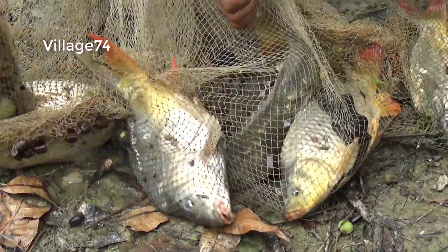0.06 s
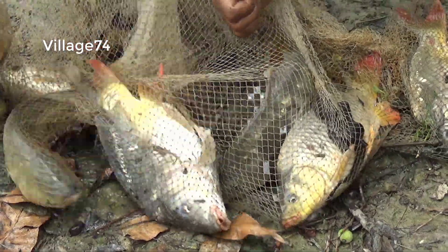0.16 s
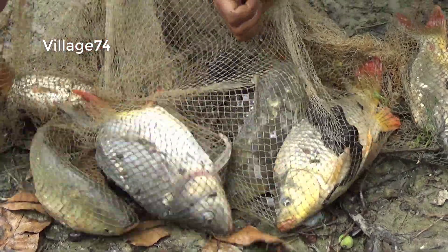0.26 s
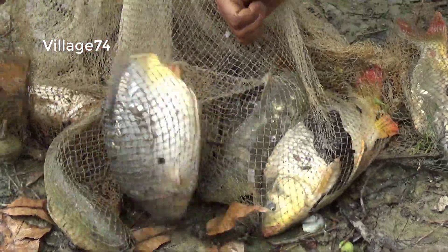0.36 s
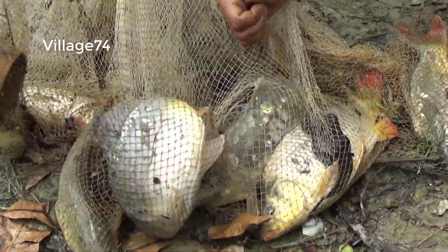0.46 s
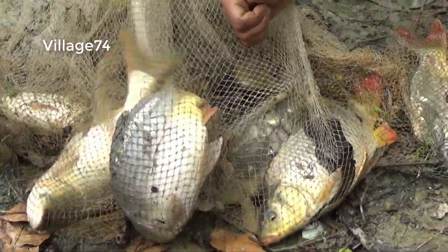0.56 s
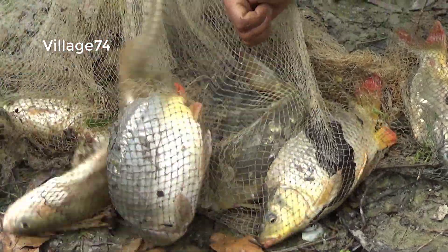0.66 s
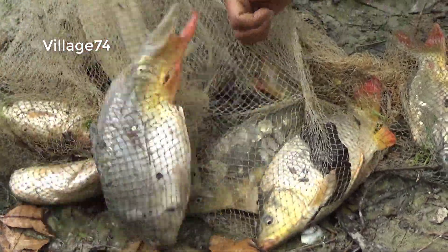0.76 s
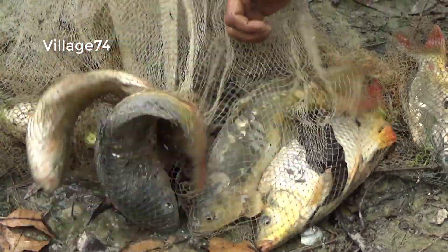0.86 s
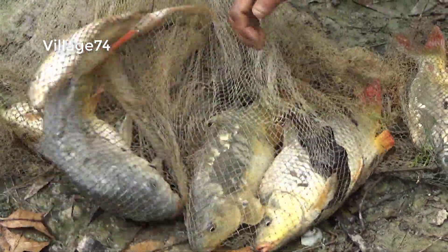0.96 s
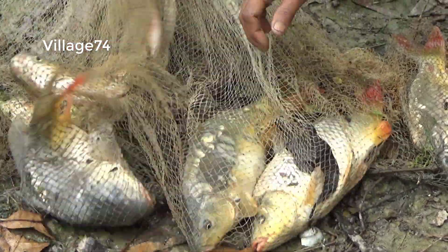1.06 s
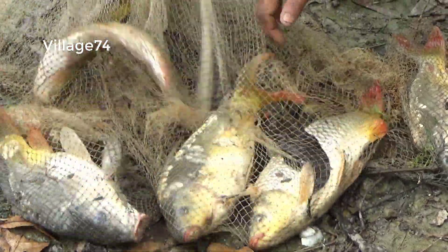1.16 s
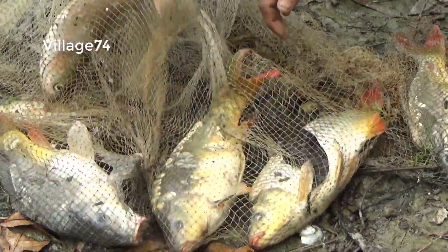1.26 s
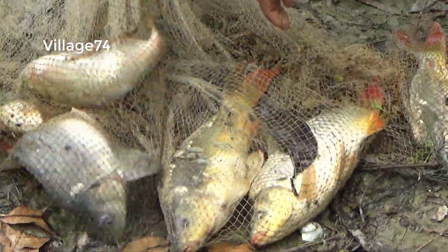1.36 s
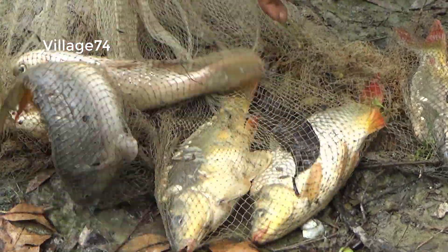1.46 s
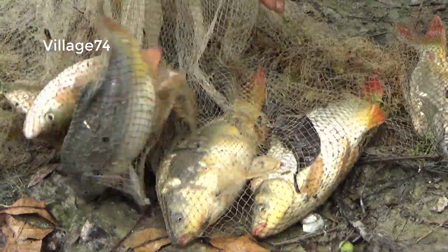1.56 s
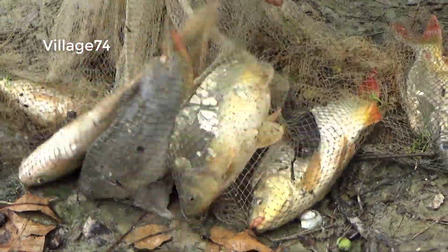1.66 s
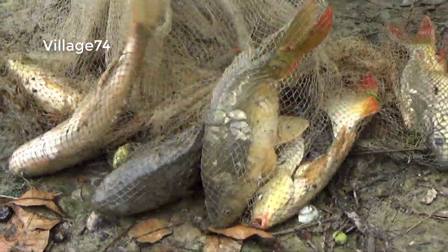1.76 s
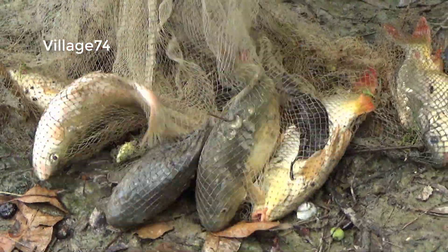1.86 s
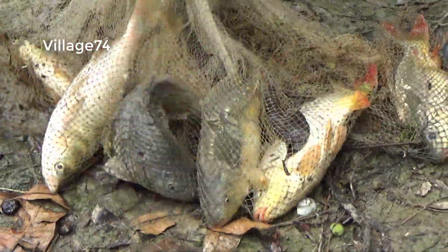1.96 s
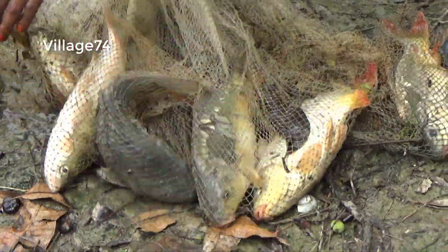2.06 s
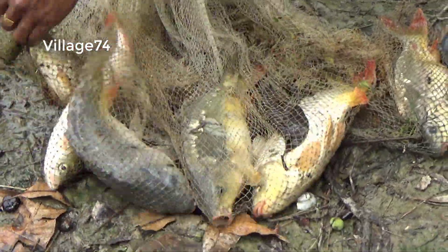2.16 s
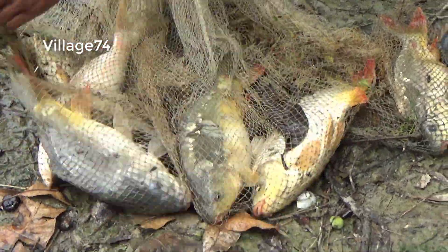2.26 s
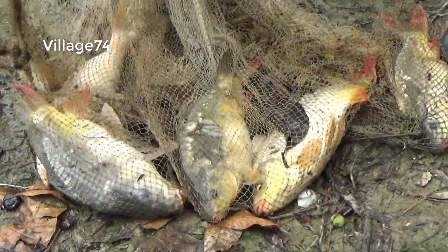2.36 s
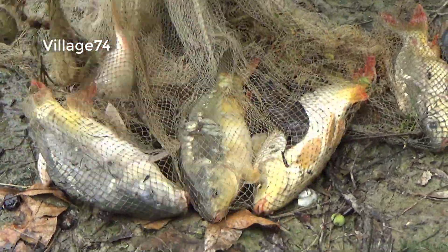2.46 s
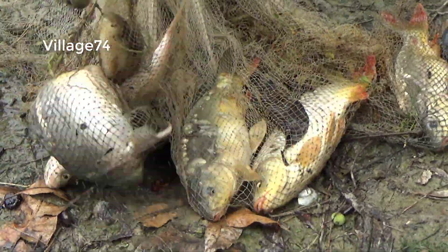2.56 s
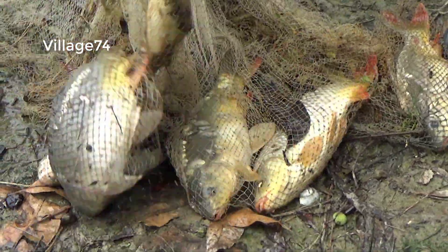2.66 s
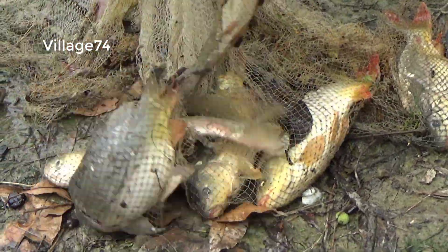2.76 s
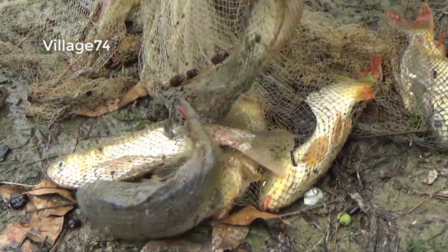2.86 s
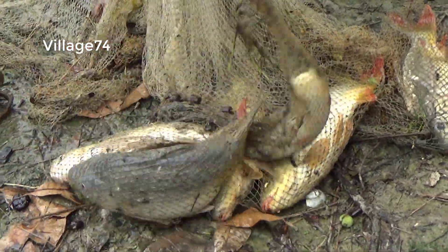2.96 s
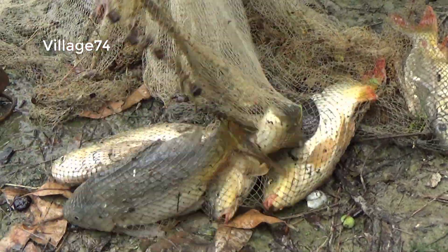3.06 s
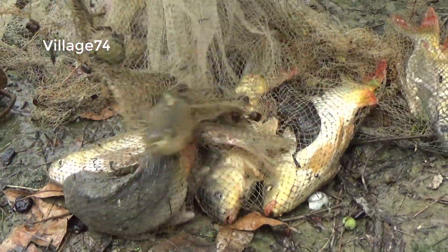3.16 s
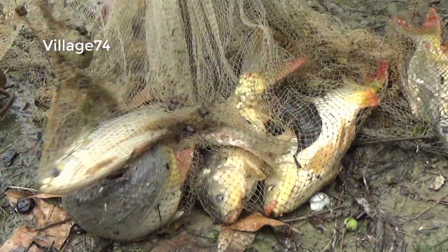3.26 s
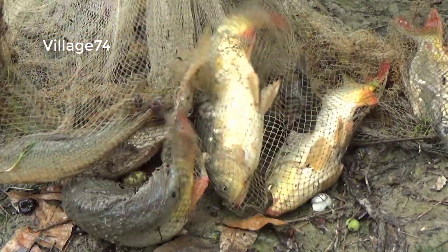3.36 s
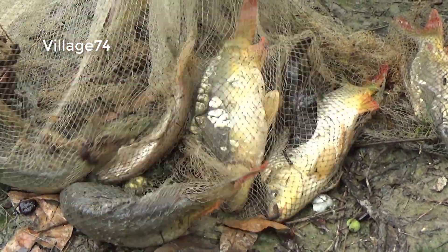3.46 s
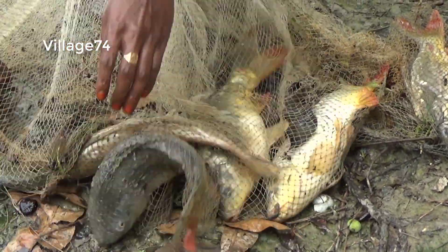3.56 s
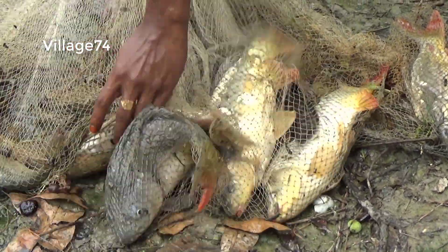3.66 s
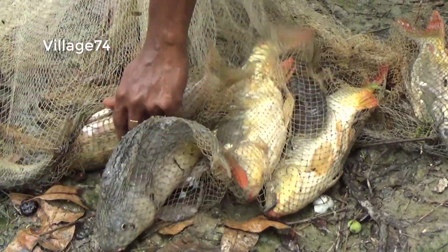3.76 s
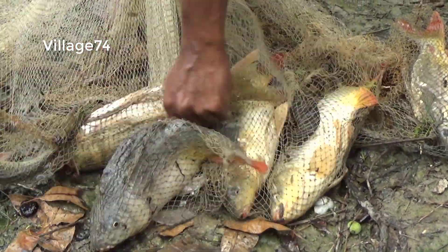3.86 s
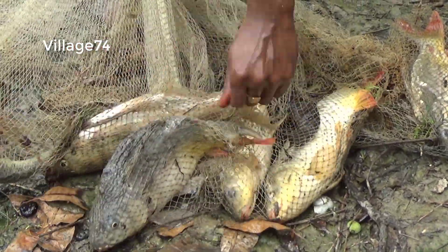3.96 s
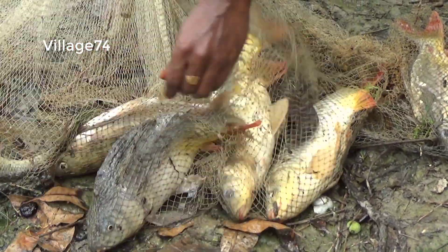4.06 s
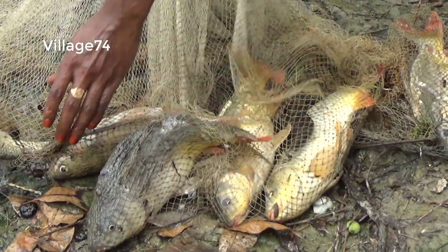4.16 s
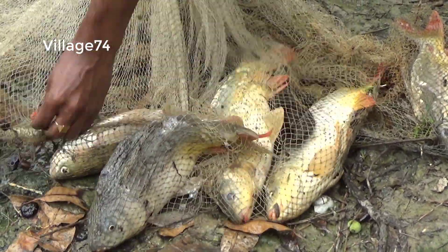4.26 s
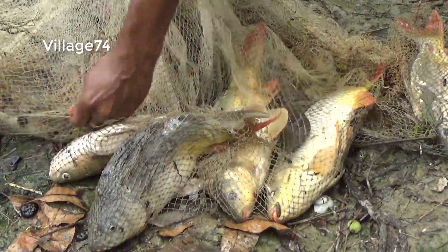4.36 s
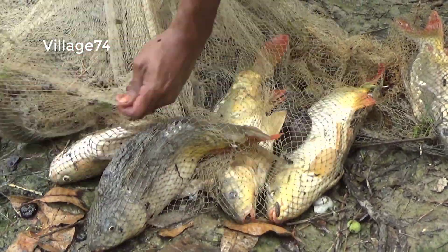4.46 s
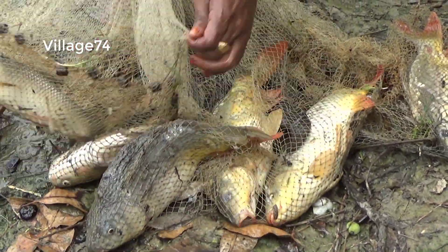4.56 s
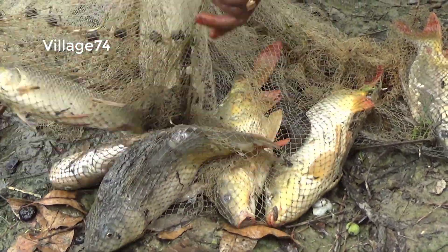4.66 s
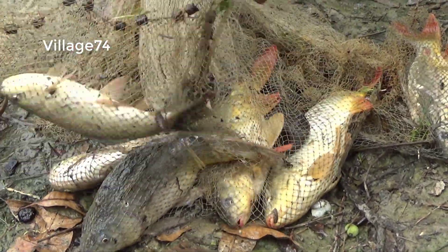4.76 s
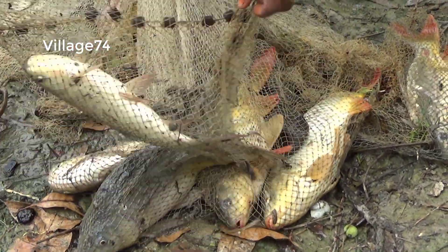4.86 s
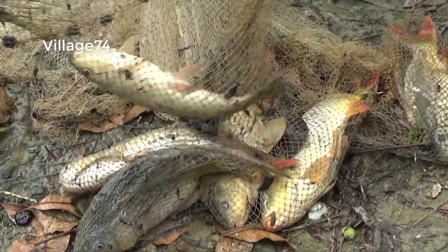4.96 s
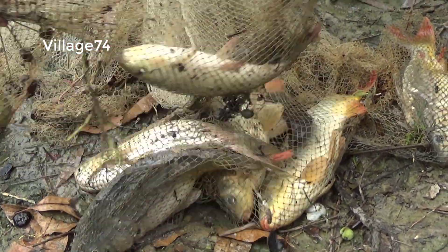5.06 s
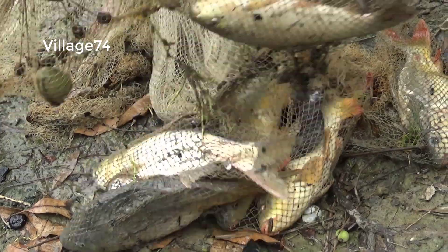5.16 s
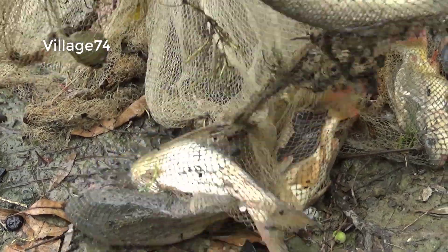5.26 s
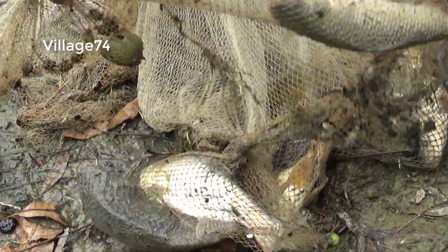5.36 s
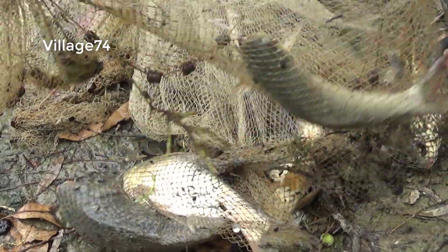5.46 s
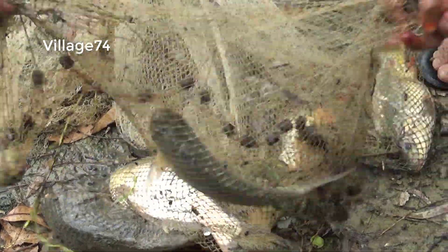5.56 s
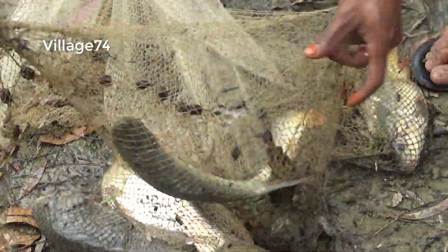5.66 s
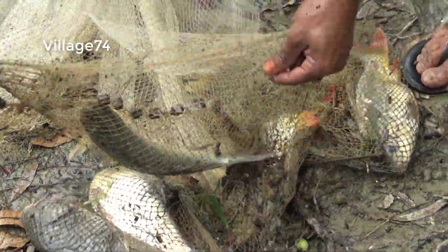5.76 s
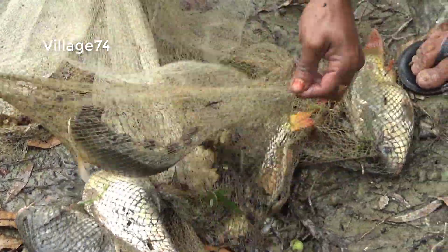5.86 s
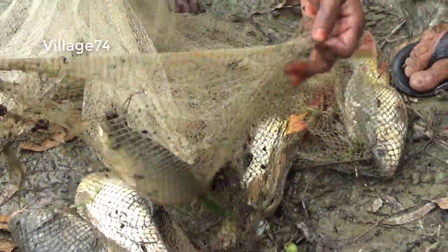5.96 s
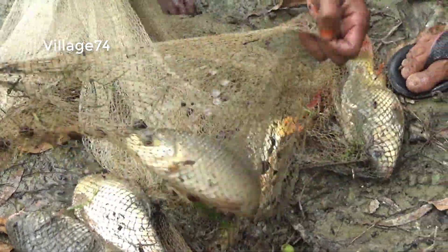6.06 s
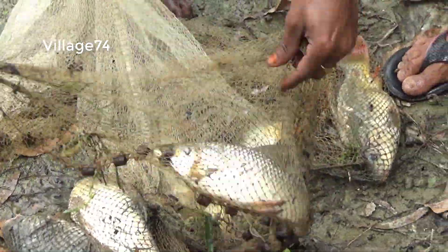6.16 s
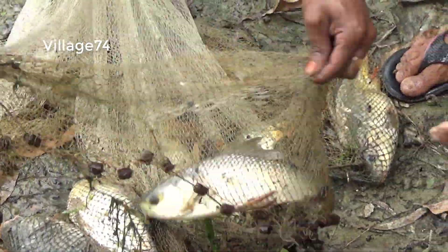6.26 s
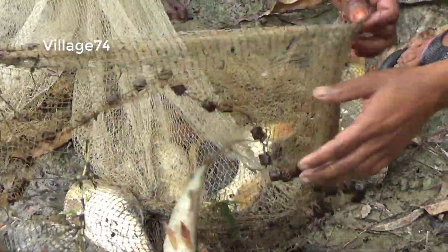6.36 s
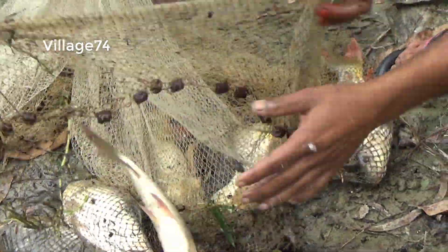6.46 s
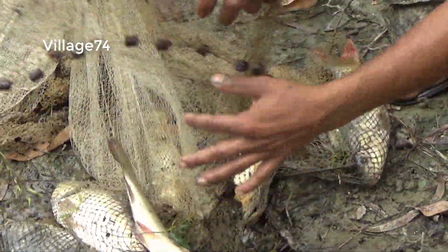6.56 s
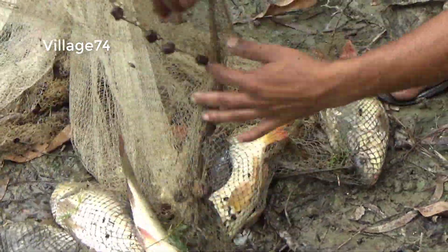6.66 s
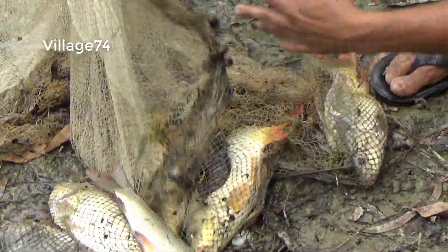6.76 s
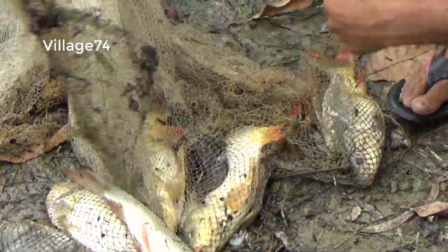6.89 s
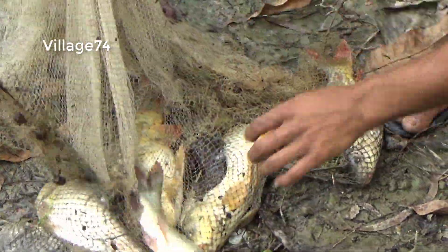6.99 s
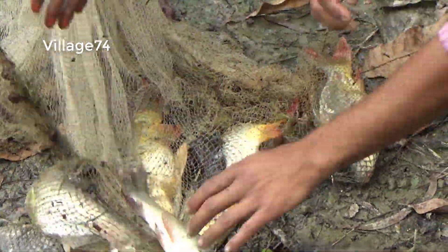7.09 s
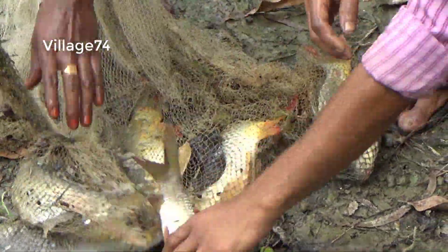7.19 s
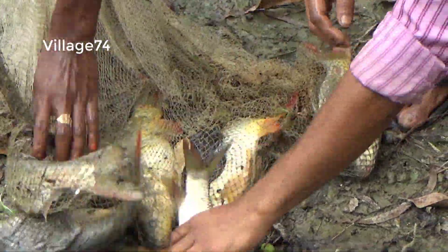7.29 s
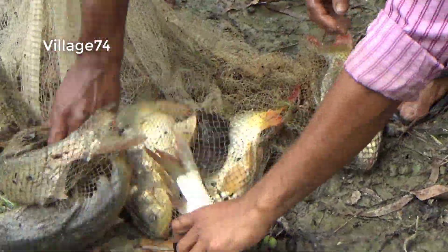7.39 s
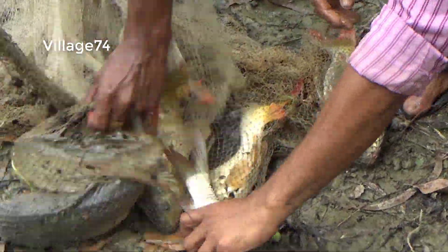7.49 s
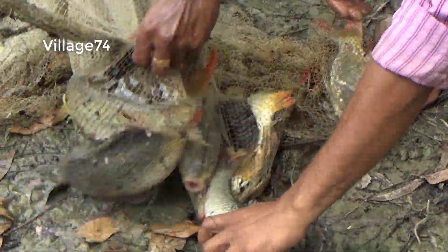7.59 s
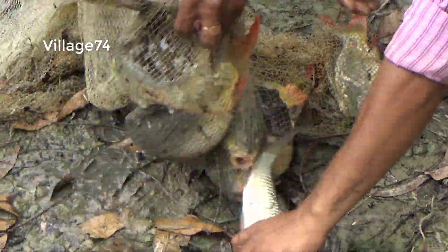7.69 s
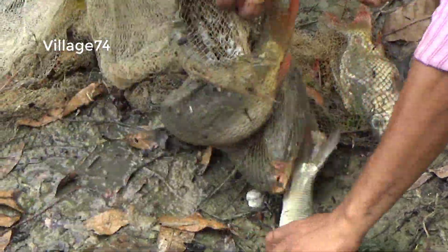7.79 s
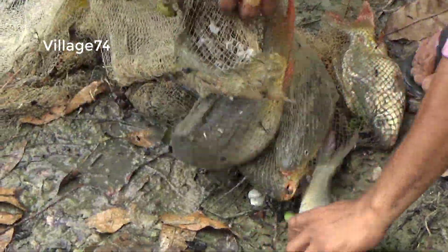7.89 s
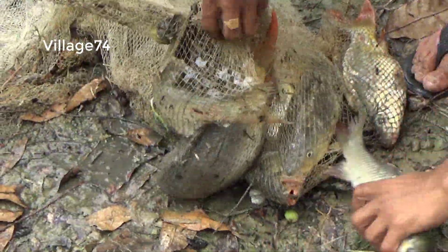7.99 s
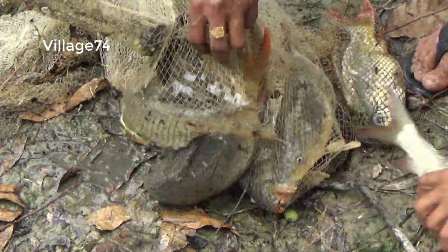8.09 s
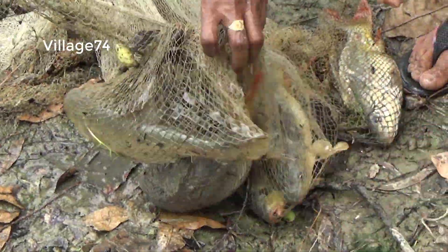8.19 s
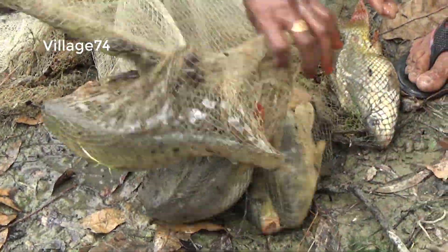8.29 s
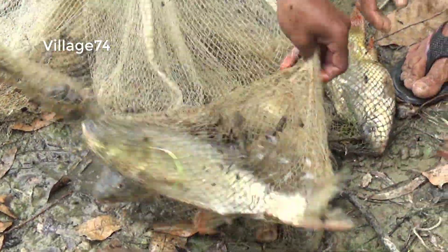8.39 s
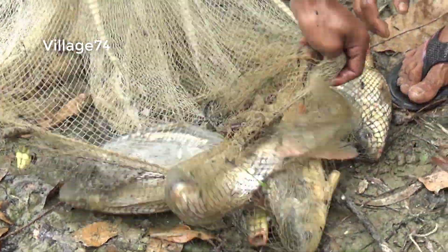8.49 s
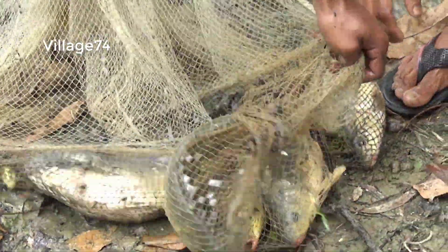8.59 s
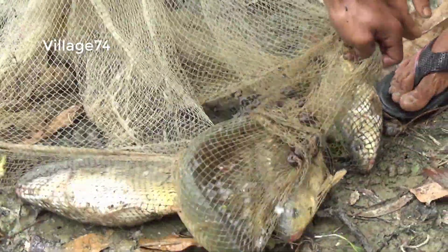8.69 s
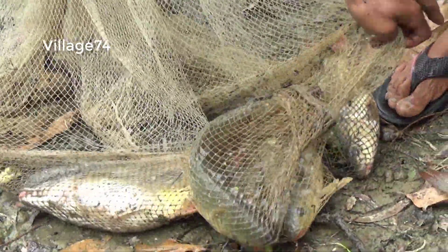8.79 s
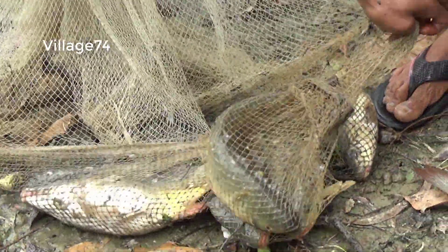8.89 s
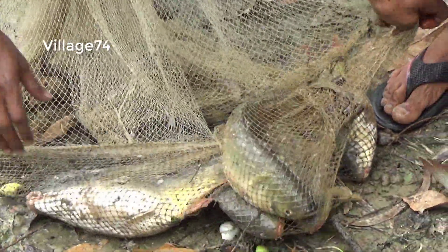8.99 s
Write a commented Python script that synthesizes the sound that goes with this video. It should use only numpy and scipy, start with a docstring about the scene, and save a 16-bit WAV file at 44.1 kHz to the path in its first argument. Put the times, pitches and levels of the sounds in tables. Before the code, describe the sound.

Close stereo microphones outdoors catch wet fish flapping inside a fishing net on soft ground. Flurries of hollow knocking slaps, slimy squelches, dull thuds and bright ticking mesh alternate with quieter rustling. The net swishes at the start and again just after five seconds. Near the end snaps gather around one strong slap and a brief sinker clink, with thin bird chips and squeaks in the background.

```python
"""Fish slap wet mud with hollow knocks and splashes; wet skin and net mesh snap, pop and crackle around them.
Knocks are short ringing tones; splashes, snaps and pops are bursts of tiny clicks, some ringing small hollows.
Dull thuds and bumps are low-pitched noise and clicks; the dragged and hauled net is a swish of random clicks.
A struck sinker is a set of fading tones. Small birds whistle from the trees, as gliding tones with a soft smear.
Behind it all lies a quiet, slightly uneven background of filtered noise."""
import sys
import numpy as np
from scipy import signal
from scipy.fft import rfft, irfft
from scipy.io import wavfile

SR = 44100
rng = np.random.default_rng(int(sys.argv[2]) if len(sys.argv) > 2 else 0)


def dump_mix(stems):
    """Bounce the given channels to the path in sys.argv[1] as a 16-bit WAV at rate SR."""
    frames = np.atleast_2d(stems).T  # one column per channel
    limited = np.clip(frames, -1, 1)  # hard clip at full scale
    pcm = np.round(limited * 32767).astype(np.int16)
    wavfile.write(sys.argv[1], SR, pcm)


N = 398223
T = np.arange(N) / SR
HIT_T = T[:SR // 6]  # time within one hit, in seconds

# Tail and flank slaps on the mud. Each row: start in seconds, knock peak in dB, knock pitch in Hz,
# splash in dB before a trim, number of contacts as the body rolls onto the mud.
SLAPS = [(0.206, -20.5, 857, -37, 1), (0.32, -23.5, 802, -39.5, 2), (0.383, -15.5, 810, -35.5, 1),
         (0.434, -29, 856, -54, 1), (0.534, -36, 775, -49, 1), (0.795, -22.5, 796, -43, 1),
         (0.814, -25, 1020, -38, 1), (0.879, -16, 854, -33.5, 1), (1.156, -23.5, 1100, -33, 1),
         (1.206, -10.5, 835, -26.5, 4), (1.392, -18.5, 848, -32.5, 1), (1.408, -12, 815, -26, 1),
         (1.601, -30.5, 764, -65, 1), (1.74, -30, 890, -39, 1), (2.26, -34, 865, -45.5, 1),
         (3.001, -21, 740, -23, 1), (3.015, -12.5, 798, -26.5, 1), (3.05, -15, 810, -33, 1),
         (3.186, -20.5, 766, -52, 1), (3.214, -21.5, 816, -39, 1), (3.37, -19, 750, -26, 3),
         (3.912, -38, 964, -46, 1), (4.923, -16.5, 810, -42.5, 1), (4.925, -22, 619, -44, 1),
         (4.955, -17.5, 754, -26, 1), (5.082, -33, 787, -39, 1), (5.207, -24.5, 770, -35, 1),
         (5.25, -29, 816, -48, 1), (5.374, -23.5, 790, -48, 1), (5.388, -22, 826, -36, 1),
         (5.402, -29, 850, -50, 1), (5.581, -23, 796, -64, 1), (5.604, -25, 772, -44, 1),
         (5.611, -14.5, 816, -44, 1), (5.642, -21, 820, -42, 2), (5.767, -28.5, 780, -45, 1),
         (5.856, -27.5, 820, -38.5, 1), (5.873, -20, 750, -31.5, 1), (6.564, -35, 750, -52, 1),
         (6.803, -38.5, 783, -62, 6), (6.983, -27, 780, -37.5, 1), (7.018, -25.5, 750, -51, 1),
         (7.054, -22.5, 860, -35, 1), (7.107, -32, 790, -45, 1), (7.761, -29, 814, -39.5, 1),
         (8.669, -15.5, 808, -23.5, 1)]
# Wet skin and mesh snapping free. Each row: start in seconds, then tick peak, splash and spray,
# each in dB before any trim.
SNAPS = [(0.1215, -7.5, -65, -43), (0.2452, -4.5, -67, -47), (0.2655, -6.5, -72, -38.5),
         (0.502, -8, -50, -37.5), (0.5739, -2, -39.5, -26.5), (0.6105, -6.5, -58, -48),
         (0.71, -16, -62, -52), (0.7282, 1, -40, -29), (0.7362, 5, -35.5, -39), (0.7402, -1, -56, -55),
         (0.7627, -16, -64, -50), (0.8704, -5, -45, -28.5), (0.9066, -3, -54, -27), (0.94, -12, -38, -45),
         (1.0226, -18, -65, -46), (1.0335, -6, -64, -39), (1.0933, -16, -38, -30.5), (1.517, -30, -41, -45),
         (1.5604, -19, -69, -47), (1.7325, -21, -46, -31.5), (1.7845, -20, -44, -28.5),
         (1.8716, -22, -63, -36), (1.954, -26, -39.5, -30), (2.1291, -18, -45, -36.5),
         (2.2463, -21, -66, -37), (2.6439, -26, -46, -32), (2.7704, -22, -47, -39.5),
         (2.9411, -5, -46, -29), (2.9841, -19, -67, -37), (3.1017, -23, -53, -27.5),
         (3.1363, -19, -44, -30), (3.18, 0, -53, -33), (3.2005, -7, -60, -28), (3.2167, 3, -58, -35),
         (3.5548, -20, -40, -29), (3.5709, -22, -30, -21.5), (3.586, -25, -38, -29),
         (3.604, -17, -37, -26.5), (3.7922, -28, -50, -34.5), (3.8065, -25, -29.5, -27),
         (3.8212, -24, -32, -38), (3.9305, -10.5, -63, -52), (4.0726, -29, -42, -45),
         (4.139, -27, -37, -34.5), (4.2202, -21, -39, -31.5), (4.2476, -14, -32.5, -45),
         (4.2655, -18, -27, -24), (4.4274, -2.5, -34, -30.5), (4.8694, -13, -63, -35.5),
         (5.277, -21, -39.5, -37), (5.486, -27, -37.5, -36), (5.9704, -32, -64, -34),
         (6.3215, -12, -69, -40), (6.3725, -4, -50, -34), (6.685, -32, -57, -35.5),
         (6.9396, -25, -46, -32.5), (7.0097, -9, -61, -31), (7.389, -24, -33.5, -31.5),
         (7.5497, -31, -47, -36.5), (7.652, -28, -44, -47), (8.3499, -26, -34, -35),
         (8.406, -16, -40.5, -34), (8.4175, -1, -40, -24.5), (8.4714, -3.5, -43, -44),
         (8.5175, -8, -60, -34), (8.531, -14, -64, -28), (8.547, -4, -59, -30.5), (8.5739, -1, -36, -24),
         (8.6158, -20, -47, -33), (8.733, -30, -41, -40), (8.8817, -13, -64, -55),
         (8.9065, -27, -48, -35.5)]
# Tone colour of splashing slime and water. Each row: frequency in Hz, relative level in dB per Hz.
SPLASH_COLOUR = [(150, -22.5), (330, -2.5), (460, -21), (550, -1), (700, 6.5), (1200, 2.5), (1500, 3),
                 (2200, 1), (3500, 2), (5500, -2), (7500, -4), (12000, -22)]
# Tone colour of fine spray and mesh. Each row: frequency in Hz, relative level in dB per Hz.
SPRAY_COLOUR = [(2500, -19), (5000, -1), (7000, 2.5), (9300, 7.5), (11000, 2.5), (13000, -3), (16000, -25)]


def from_db(db):
    """Turn decibels into a gain."""
    return 10 ** (np.asarray(db) / 20)


def rms_one(x):
    """Scale to an average strength (rms) of 1."""
    return x / np.sqrt(np.mean(x ** 2) + 1e-20)


def fade(t60):
    """Decay over one hit, falling 60 dB in t60 seconds."""
    return from_db(-60 * HIT_T / max(t60, 1e-4))


def add(track, s, sound):
    """Mix a sound into a track from time s in seconds."""
    at = int(np.clip(round(s * SR), 0, N - 1))
    track[..., at:at + sound.shape[-1]] += sound[..., :N - at]


def placed(x, pan_db):
    """Make stereo, left louder than right by pan_db."""
    return x * from_db([[pan_db / 2], [-pan_db / 2]])


def colour(x, spectrum):
    """Filter to the given spectrum without sounding ahead of the input (minimum phase); unit power gain."""
    size = 4096
    hz, db = np.transpose(spectrum)
    bins_hz = np.arange(size // 2 + 1) * SR / size
    gain = from_db(np.interp(np.log(bins_hz + 1), np.log(hz), db))
    cepstrum = irfft(np.log(rms_one(gain)))[:size // 2]
    # doubling all but the first value moves the filter's energy to its start
    one_sided = cepstrum * np.where(np.arange(size // 2) > 0, 2, 1)
    response = irfft(np.exp(rfft(one_sided, size)))
    return signal.oaconvolve(np.atleast_2d(x), response[None], axes=-1)[:, :N]


def resonate(x, hz, q):
    """Ring at one pitch; a higher q rings longer."""
    b, a = signal.iirpeak(min(hz, .45 * SR), max(q, 1), fs=SR)
    return signal.lfilter(b, a, x + 1e-18)


def drift(per_s):
    """Random wander around 0, with per_s new random values a second."""
    return np.interp(T * per_s, np.arange(4096), rng.standard_normal(4096))


def grains(per_s, spread_db, count):
    """Random clicks of uneven size over count samples, rms 1."""
    sizes = from_db(spread_db * np.minimum(rng.exponential(1, count), 4)) * rng.choice([-1, 1], count)
    return rms_one(sizes * (rng.random(count) < per_s / SR))


def spread(per_s, spread_db, width):
    """Clicks from all over the net, partly different on each side."""
    middle = grains(per_s, spread_db, count=N)
    return middle + width * grains(per_s, spread_db, count=N) * np.array([[1], [-1]])


def patter(per_s, spread_db, low_hz, high_hz, q, count=12):
    """Random clicks, each ringing briefly at one of count pitches; rms 1."""
    clicks = grains(per_s, spread_db, count=N)
    dealt = rng.integers(0, count, N)
    pitches = np.geomspace(low_hz, high_hz, count)
    return rms_one(sum(rms_one(resonate(clicks * (dealt == k), hz, q)) for k, hz in enumerate(pitches)))


def burst(t60, tail_db, tail_t60, per_s, rise, cavity_hz, cavity_share):
    """A wet film tears: dense clicks die fast and ring a small hollow of chance size."""
    shape = (fade(t60) + from_db(tail_db) * fade(tail_t60)) * (1 - np.exp(-HIT_T / rise))
    clicks = rms_one(grains(per_s, 2.95, count=len(HIT_T)) * shape)
    hollow = resonate(clicks, cavity_hz * 2 ** rng.uniform(-0.744, 0.51), q=13.0)
    clicks = clicks + cavity_share * rms_one(hollow)
    # same energy as 20 ms of sound at rms 1
    return clicks * np.sqrt(.02 * SR / np.sum(clicks ** 2))


def lead_in(t60, per_s):
    """Mesh slips over a moving body: clicks swell up to the contact."""
    return grains(per_s, 0.86, count=len(HIT_T)) * fade(t60)[::-1]


def around(events, scatter_s):
    """Pick one chance moment near each event: rows of time in seconds and two chance values."""
    rows = np.clip(rng.standard_normal((len(events), 3)), -2, 2)
    rows[:, 0] = [event[0] for event in events] + scatter_s * rows[:, 0]
    return rows


def net_levels():
    """How busy the net is, its crackle rising around each slap and snap: times, dragging dB, mesh dB."""
    # Net in motion. Each row: time in seconds, dragging in dB and mesh crackle in dB, both before trims.
    motion = [(0.0, -49, -42), (0.6, -59, -46), (1.05, -49.5, -44), (1.33, -49, -49), (1.48, -55.5, -50),
              (1.71, -54.5, -46), (1.89, -54.5, -44.5), (2.04, -48.5, -42.5), (2.21, -61.5, -45),
              (2.99, -53, -47), (3.14, -45, -39), (3.22, -47, -45.5), (3.42, -52, -39.5),
              (3.77, -48.5, -46), (3.9, -51.5, -47.5), (4.35, -56.5, -50.5), (4.68, -56.5, -47),
              (4.95, -61.5, -54), (5.1, -46, -50), (5.26, -53, -42.5), (5.51, -53.5, -48.5),
              (6.16, -62.5, -52), (6.66, -59.5, -48), (6.87, -58.5, -47), (6.99, -53, -52),
              (7.27, -58, -49.5), (7.69, -56.5, -49.5), (8.17, -57.5, -44), (8.521, -52, -42),
              (8.75, -57.5, -46.5), (8.9, -53, -45.5), (9.03, -57, -53)]
    shake_db, shake_s = 0.5, 0.14
    s = T[::200]
    when, drag_db, mesh_db = np.transpose(motion)
    blows = np.array([row[0] for row in list(SLAPS) + list(SNAPS)])
    nearest_s = np.abs(s[:, None] - blows).min(axis=1)
    shake = np.exp(-(nearest_s / shake_s) ** 2)
    return s, np.interp(s, when, drag_db), np.interp(s, when, mesh_db) + shake_db * shake


def body_contacts():
    """Each slap is a quick run of contacts, with a pat nearby: rows (s, knock dB, pitch Hz, splash dB)."""
    contact_gap_s = .0157
    pocket_spread = 0.021  # the air pocket changes size after the first contact: share of the pitch
    pat_scatter_s, pat_spread_db, pat_hz = .035, 3, 796
    pat_db = np.array((18.5, 6))  # typical knock and splash of a pat, in dB above the dragging
    rows = []
    for s, db, hz, splash_db, count in SLAPS:
        for k in range(round(count)):
            retune = 1 + pocket_spread * min(k, 1) * rng.standard_normal()
            rows.append((s + k * contact_gap_s, db, hz * retune, splash_db))
    when, drag_db, _ = net_levels()
    for s, size, detune in around(SLAPS, pat_scatter_s):
        knock_db, splash_db = np.interp(s, when, drag_db) + pat_db + pat_spread_db * size
        rows.append((s, knock_db, pat_hz * (1 + 0.063 * detune), splash_db))
    return rows


def mesh_snaps():
    """Loud snaps, and others nearby that follow how busy the net is: rows (s, tick dB, splash dB, spray dB)."""
    scatter_s, spread_db = 0.03, 4
    snap_db = np.array((21, -7.5, 5))  # typical tick, splash and spray, in dB above the mesh crackle
    when, _, mesh_db = net_levels()
    rows = list(SNAPS)
    for s, size, _ in around(SNAPS, scatter_s):
        rows.append((s, *(np.interp(s, when, mesh_db) + snap_db + spread_db * size)))
    return rows


def knocks(contacts, rise=0.0019, press_t60=0.014, flutter=0.051):
    """Air trapped under a slapping fish rings briefly; the flank flutters as it flattens and keeps it going."""
    # Tones of the air pocket. Each row: typical ratio to the knock pitch, typical relative level in dB,
    # time to fall 60 dB in seconds.
    pocket_tones = [(0.7, -21.5, 0.044), (0.898, -6.5, 0.035), (1.001, 2, 0.035), (1.12, -6, 0.04),
                    (1.3, -14, 0.05), (1.55, -16, 0.033)]
    glide_per_s = 1.93  # how far the pitch may slide as the pocket is squeezed
    out = np.zeros(N)
    for s, db, pitch_hz, _ in contacts:
        ring = 0
        squeezed = HIT_T * (1 + .5 * glide_per_s * rng.uniform(-1.25, 1) * HIT_T)
        for ratio, mode_db, t60 in pocket_tones:
            size, detune = rng.standard_normal(2)
            hz = pitch_hz * ratio * (1 + 0.413 * (ratio - 1) * detune)
            tone = np.sin(2 * np.pi * (hz * squeezed + rng.random()))
            ring = ring + from_db(mode_db + 2 * size) * fade(t60) * tone
        press = rng.standard_normal(len(HIT_T)) * fade(press_t60)
        pressed = signal.fftconvolve(ring, press)[:len(HIT_T)]
        ring = (rms_one(ring) + flutter * rms_one(pressed)) * (1 - np.exp(-HIT_T / rise))
        add(out, s, from_db(db) * ring / np.abs(ring).max())
    return placed(out, pan_db=0.5)


def quivers(pocket_hz=800, q=5.4, pats_per_s=450, smack_db=-14, size_spread=0.086):
    """Many tiny wet pats keep air pockets of three sizes murmuring under a fish."""
    # A flank quivering on the mud. Each row: middle in seconds, length in seconds, level in dB.
    flurries = [(0.328, 0.034, -27), (0.526, 0.17, -42), (0.951, 0.064, -37.5), (1.3, 0.12, -42.5),
                (2.042, 0.16, -43), (3.252, 0.043, -37), (5.637, 0.021, -45), (6.354, 0.028, -39),
                (6.522, 0.02, -41.5)]
    effort = sum(from_db(db) * np.exp(-(2 * (T - s) / length) ** 2) for s, length, db in flurries)
    pockets = pocket_hz * (1 + size_spread * np.array([-1, 0, 1]))
    pats = grains(pats_per_s, 2.7, count=N)
    dealt = rng.integers(0, len(pockets), N)
    rings = [resonate(resonate(pats * (dealt == k), hz, q), hz, q) for k, hz in enumerate(pockets)]
    murmur = rms_one(sum(rings))
    return placed(effort * (murmur + from_db(smack_db) * colour(pats, SPLASH_COLOUR)), pan_db=-0.5)


def wet_contacts(contacts, snaps, slap_splash_db=1.5, snap_spray_db=-1, tick_db=-7, slip_db=-7, smear_db=-11):
    """Slaps squeeze out slime and water; snaps are a short slip, a sharp tick and a fizz."""
    spray_re_splash_db = -4.5
    pan_spread_db = 2.1  # contacts fall a little to the left or right
    splash, spray = np.zeros((2, 2, N))
    early = len(HIT_T) / SR
    slaps = [(s, splash_db, splash_db + spray_re_splash_db) for s, _, _, splash_db in contacts]
    for s, splash_db, spray_db in slaps:
        pan_db = pan_spread_db * rng.standard_normal()
        squeeze = burst(t60=0.024, tail_db=-9.0, tail_t60=0.12, per_s=10000, rise=0.00054,
                        cavity_hz=1984, cavity_share=0.15)
        fizz = burst(t60=0.014, tail_db=-19.0, tail_t60=0.22, per_s=2800, rise=0.00012,
                     cavity_hz=7500, cavity_share=0.12)
        add(splash, s, placed(from_db(splash_db + slap_splash_db) * squeeze, pan_db))
        add(spray, s, placed(from_db(spray_db) * fizz, pan_db))
    for s, peak_db, splash_db, spray_db in snaps:
        pan_db = pan_spread_db * rng.standard_normal()
        tick_hz = 9200 * 2 ** rng.uniform(-0.04, 0.27)
        tick = fade(0.0016) * np.cos(2 * np.pi * tick_hz * HIT_T)
        squeeze = burst(t60=0.023, tail_db=-14, tail_t60=0.16, per_s=7700, rise=0.00011,
                        cavity_hz=2580, cavity_share=0.16)
        fizz = burst(t60=0.012, tail_db=-24.0, tail_t60=0.18, per_s=1900, rise=0.001,
                     cavity_hz=8320, cavity_share=0.14)
        add(splash, s, placed(from_db(splash_db) * squeeze, pan_db))
        tick_and_fizz = from_db(peak_db + tick_db) * tick + from_db(spray_db + snap_spray_db) * fizz
        add(spray, s, placed(tick_and_fizz, pan_db))
    for s, *_, splash_db, spray_db in slaps + snaps:
        inside = int(max(early - s, 0) * SR)  # skip what would come before the start
        slip = lead_in(t60=0.034, per_s=2900)[inside:]
        smear = lead_in(t60=0.013, per_s=5800)[inside:]
        add(spray, s - early, from_db(spray_db + slip_db) * slip)
        add(splash, s - early, from_db(splash_db + smear_db) * smear)
    return placed(colour(splash, SPLASH_COLOUR), pan_db=1.0) + placed(colour(spray, SPRAY_COLOUR), pan_db=2.0)


def pops(level_db=-1, t60=0.031, q=2.0, per_s=2500):
    """A film of slime parts in a quick run of clicks that ring the small hollow behind it."""
    # Pops between wet bodies. Each row: start in seconds, peak in dB before the trim level_db, pitch in Hz.
    events = [(0.106, -22.5, 1000), (0.194, -20.5, 2780), (0.321, -43, 2900), (0.34, -36, 2900),
              (0.5, -30.5, 1500), (0.537, -30, 1430), (0.596, -20.5, 3330), (0.8, -24, 1660),
              (0.822, -33, 2300), (0.863, -20, 1400), (0.881, -24, 1840), (0.956, -28, 1530),
              (1.104, -22, 2900), (1.158, -17.5, 1920), (1.168, -19, 1790), (1.192, -36, 2300),
              (1.76, -29, 1870), (1.919, -25, 1710), (1.932, -21, 4400), (1.986, -32, 2400),
              (2.608, -28.5, 1650), (3.137, -27, 3400), (3.909, -25.5, 1760), (4.429, -14, 2070),
              (5.061, -22.5, 2800), (5.605, -21, 1940), (6.588, -28, 2090), (8.406, -26, 1780),
              (8.712, -25, 1600), (8.734, -20.5, 2000)]
    out = np.zeros(N)
    for s, db, hz in events:
        clicks = grains(per_s, 2.7, count=len(HIT_T)) * fade(t60)
        pop = resonate(resonate(clicks, hz, q), hz, q / 2)
        add(out, s, from_db(db + level_db) * pop / np.abs(pop).max())
    return placed(out, pan_db=1.0)


def thuds(contacts, t60=0.074, level_db=-2, ground_hz=115, ground_db=-7):
    """Soft mud takes the weight of a body with a short, dull shudder; the ground beneath answers lower."""
    # Heavy bodies landing. Each row: time in seconds, peak in dB before the trim level_db, pitch in Hz.
    landings = [(0.877, -25.5, 300), (1.952, -29.5, 290), (3.808, -32, 239), (4.248, -42, 335),
                (4.426, -36.5, 335), (4.44, -36, 142), (4.953, -33, 350), (5.085, -32.5, 350),
                (5.142, -38, 187.5), (5.265, -38, 333), (5.485, -34, 286), (6.978, -36, 223),
                (7.016, -37, 145.5), (7.915, -44, 110), (8.348, -37, 296), (8.403, -32, 312),
                (8.604, -35, 298), (8.94, -27.5, 262)]
    thud_re_splash_db, slap_thud_hz = -17, 350  # a thud goes with every slap contact too
    out = np.zeros(N)
    under_slaps = [(s, splash_db + thud_re_splash_db, slap_thud_hz) for s, _, _, splash_db in contacts]
    for s, db, hz in list(landings) + under_slaps:
        band = signal.butter(2, [hz * 0.617, hz * 1.18], "band", fs=SR, output="sos")
        weight = rng.standard_normal(len(HIT_T)) * fade(t60)
        push = signal.sosfilt(band, weight) + from_db(ground_db) * resonate(weight, ground_hz, q=1)
        add(out, s - .002, from_db(db + level_db) * push / np.abs(push).max())
    return out


def bumps(level_db=-2, clump_db=4.5):
    """Bodies and hands shift on the soft ground in small dull bumps that follow the dragging level."""
    s, drag_db, _ = net_levels()
    rumble = patter(per_s=170, spread_db=2.5, low_hz=110, high_hz=416, q=2.2)
    clumps = clump_db * (drift(22) - 2)
    return from_db(np.interp(T, s, drag_db) + level_db + clumps) * rumble


def net(drag_db=2.0, drag_width=0.21, squelch_db=1, squelch_clump_db=3.0,
        hiss_db=-7, crackle_db=-7, jerk_db=6.0, clump_db=4):
    """The net drags over mud and scales in jerks; slime pops under it and wet knots catch and slip in clumps."""
    # Tone colour of the dragging. Each row: frequency in Hz, relative level in dB per Hz.
    drag_colour = [(40, -7), (120, -4), (300, 6.5), (450, -6), (620, 10.5), (810, 9.5), (1050, 1),
                   (1600, -9), (3000, 6.5), (5000, 0.5), (8000, -14.5), (15000, -42)]
    # below the mesh level that counts as taut, knots snag less: extra dB lost per dB
    taut_net_db, snag_growth = -42.5, 0.49
    s, drag_level, mesh_level = net_levels()
    drag_level, mesh_level = np.interp(T, s, drag_level), np.interp(T, s, mesh_level)
    jerks = jerk_db * drift(45)
    drag = colour(from_db(drag_db + jerks) * spread(9000, 2.04, drag_width), drag_colour)
    slime = patter(per_s=1300, spread_db=3.5, low_hz=780, high_hz=6200, q=4.2)
    squelch = from_db(squelch_db + squelch_clump_db * drift(110)) * slime
    hiss = from_db(hiss_db + jerks) * spread(5000, 0.83, 0.049)
    snagging = snag_growth * np.minimum(mesh_level - taut_net_db, 0)
    knots = patter(per_s=890, spread_db=4.5, low_hz=5060, high_hz=14000, q=4.6)
    crackle = from_db(crackle_db + snagging + clump_db * drift(60)) * knots
    ground = from_db(drag_level) * (drag + squelch)
    mesh = from_db(mesh_level) * (hiss + crackle)
    return placed(ground, pan_db=1.0) + colour(mesh, SPRAY_COLOUR)


def hauls(width=0.048, judder_db=-0.6, judder_per_s=150):
    """Folds of net are hauled over each other: threads catch and slip in a gritty, juddering swish."""
    # One list for each haul. Each row: time in seconds, level in dB before the judder.
    pulls = [
        [(0, -26), (.05, -28), (.1, -35), (.15, -63)],
        [(5.03, -48), (5.1, -36), (5.17, -28.5), (5.24, -32.5), (5.33, -56)],
    ]
    # Tone colour of the hauled net. Each row: frequency in Hz, relative level in dB per Hz.
    swish_colour = [(100, -43), (300, 0), (460, -7.5), (800, 7.5), (1000, -1), (1200, 2), (1800, -7),
                    (3300, -3), (5100, 4.5), (6500, -3.5), (10000, 0.5), (12000, -16), (15000, -23)]
    effort = sum(from_db(np.interp(T, *np.transpose(rows), left=-120, right=-120)) for rows in pulls)
    judder = from_db(judder_db * drift(judder_per_s))
    return placed(colour(effort * judder * spread(7000, 1.6, width), swish_colour), pan_db=1.0)


def clinks(t60_rattle=0.011):
    """A struck sinker on the net's rim rattles against its neighbours and rings briefly."""
    # Strikes. Each row: start in seconds, level in dB.
    strikes = [(8.667, -23)]
    # Tones of the ring. Each row: pitch in Hz, relative level in dB, time to fall 60 dB in seconds.
    ring_tones = [(1040, -1, 0.09), (2100, -21, .035), (2940, 4, 0.15), (2990, -12, .06), (3350, -10, 0.11),
                  (5640, -8, .04)]
    out = np.zeros(N)
    for s, db in strikes:
        ring = sum(from_db(mode_db) * fade(t60) * np.sin(2 * np.pi * hz * HIT_T)
                   for hz, mode_db, t60 in ring_tones)
        rattle = 1 + .5 * fade(t60_rattle) * rng.standard_normal(len(HIT_T))
        add(out, s, from_db(db) * ring * rattle)
    return placed(out, pan_db=1.0)


def trees(x, t60, delay, width):
    """Sound scatters diffusely, as from trunks and leaves, weak in the bass and the top."""
    t = T[:SR]
    mid, side = rng.standard_normal((2, SR)) * from_db(-60 * t / t60) * (1 - np.exp(-t / delay))
    band = signal.butter(1, [500, 6000], "band", fs=SR, output="sos")
    echo = signal.sosfilt(band, [mid + width * side, mid - width * side])
    return signal.fftconvolve(x.mean(0)[None], rms_one(echo) / np.sqrt(SR), axes=-1)[:, :N]


def calls(rows, shape, level_db):
    """A whistle follows its shape, retuned at each call and never quite steady in pitch or level."""
    flutter_per_s, flutter_db, warble_share = 213, 3.5, 0.011  # rate, level, share of the pitch
    out = np.zeros(N)
    when, hz, db = np.transpose(shape)
    t = T[:int(when[-1] * SR)]
    envelope = from_db(np.interp(t, when, db)) * signal.get_window(("tukey", .2), len(t))
    for s, call_db in rows:
        wander = rng.standard_normal(size=(2, 64))
        warble, flutter = [np.interp(t * flutter_per_s, np.arange(len(row)), row) for row in wander]
        retune = 1 + 0.00817 * rng.standard_normal() + warble_share * warble
        tone = np.sin(2 * np.pi * np.cumsum(np.interp(t, when, hz) * retune) / SR)
        add(out, s, from_db(call_db + level_db + flutter_db * flutter) * envelope * tone)
    return out


def birds(chip_direct_db=-2.0, squeak_direct_db=-5.5, near_scatter_db=-3, scatter_db=-1.0):
    """Calls carry a softer smear; the answering bird is in the open, chips and squeaks come from behind leaves."""
    # When each call sounds. Each row: start in seconds, level in dB before trims.
    chip_times = [(2.33, -40.5), (2.657, -39.5), (2.969, -45), (3.294, -39), (3.602, -40), (3.925, -41),
                  (4.265, -41.5), (4.585, -40.5), (4.927, -36.5), (5.266, -40), (5.617, -42.5),
                  (5.983, -42), (6.322, -42), (6.672, -40), (7.016, -39), (7.36, -43), (7.728, -42),
                  (8.074, -43), (8.427, -42.5), (8.785, -41.5)]
    squeak_times = [(2.537, -39), (2.857, -40), (3.487, -41), (4.457, -40), (4.802, -41.5), (5.15, -38),
                    (5.488, -43), (6.2, -41), (6.546, -41), (6.885, -43), (7.223, -42), (7.605, -43),
                    (7.945, -42), (8.285, -42.5), (8.657, -44), (9.01, -43)]
    answer_times = [(4.277, -37), (4.535, -37), (4.692, -36), (5.087, -36), (5.341, -35), (5.496, -38),
                    (5.756, -38.5), (5.915, -38.5)]
    whistle_times = [(3.22, -36.5), (3.548, -36)]
    low_note_times = [(3.675, -44)]
    slur_times = [(8.975, -42)]
    # Falling chip, rising squeak, sharp answering note, long falling whistle, low trailing note, upward slur.
    # Each row: seconds after the call's start, pitch in Hz before retuning, relative level in dB.
    chip_shape = [(0, 3667, -5), (.018, 3380, 3), (.035, 2960, 0), (.052, 2480, -3), (.08, 2010, -19)]
    squeak_shape = [(0, 4020, -1.5), (.007, 4616, 1), (0.014, 5200, 1), (0.027, 5650, 1)]
    answer_shape = [(0, 2290, -17), (.011, 3480, -4.5), (.017, 4160, -0.5), (.029, 3980, -5.5),
                    (.037, 3400, -2), (.052, 2535, -7)]
    whistle_shape = [(0, 2620, -11), (.045, 2430, -5), (.108, 1900, 0.5)]
    low_note_shape = [(0, 1714, 3), (.1, 1505, -9)]
    slur_shape = [(0, 2100, -2), (0.026, 2310, -4), (.06, 2750, -6)]
    chips = calls(chip_times, chip_shape, level_db=-1.0)
    squeaks = calls(squeak_times, squeak_shape, level_db=0.5)
    clear = calls(answer_times, answer_shape, level_db=2.5)
    clear = clear + calls(whistle_times, whistle_shape, level_db=-2.5)
    clear = clear + calls(low_note_times, low_note_shape, level_db=-1.5)
    clear = clear + calls(slur_times, slur_shape, level_db=-3.0)
    scattered = chips + squeaks + from_db(near_scatter_db) * clear
    smear = from_db(scatter_db) * trees(scattered[None], t60=0.47, delay=0.00041, width=0.33)
    return clear + from_db(chip_direct_db) * chips + from_db(squeak_direct_db) * squeaks + smear


def air():
    """Quiet open-air background: filtered noise that swells and sinks, partly different on each side."""
    # Tone colour of the background. Each row: frequency in Hz, relative level in dB per Hz.
    air_colour = [(20, -25), (45, -1.5), (100, -4.5), (230, -4), (450, -7.5), (800, -32), (1500, -13),
                  (3000, -18), (6000, -23), (10000, -61), (13000, -18), (16000, -36)]
    level_db, waver_db, waver_per_s = -56, 1, 8.1
    mid, side = colour(rng.standard_normal((2, N)), air_colour)
    return from_db(level_db + waver_db * drift(waver_per_s)) * (mid + 0.5 * side * [[1], [-1]])


def scene():
    """Fish and net close by, with faint scatter from the ground and the trees, birds and air."""
    contacts, snaps = body_contacts(), mesh_snaps()
    fish = knocks(contacts) + quivers() + wet_contacts(contacts, snaps) + pops() + thuds(contacts) + bumps()
    catch = fish + net() + hauls() + clinks()
    near = from_db(-11.5) * trees(catch, t60=0.02, delay=0.00061, width=0.11)
    far = from_db(-19.0) * trees(catch, t60=0.34, delay=0.00077, width=0.21)
    return catch + near + far + birds() + air()


def record(dry, lag_share=0.014):
    """Two close capsules hear the left side slightly earlier; high peaks are rounded and the top is cut."""
    # How strongly the capsules tell left from right. Each row: frequency in Hz, relative level in dB.
    width_colour = [(30, -20), (120, -6), (300, 1), (800, 8), (2000, 5.5), (4500, 7.5), (7000, 8),
                    (10000, -3.5), (15000, -26)]
    cutoff_hz, ceiling = 16000, .75
    mid, side = (dry[0] + dry[1]) / 2, (dry[0] - dry[1]) / 2
    side = side + lag_share * np.gradient(mid)  # a tiny delay shows as the slope of the wave
    stereo = mid + colour(side, width_colour) * [[1], [-1]]
    rounded = ceiling * np.tanh(stereo / ceiling)
    return signal.sosfilt(signal.ellip(8, .1, 80, cutoff_hz, fs=SR, output="sos"), rounded)


dry = scene()
out = record(dry)
dump_mix(out)
```